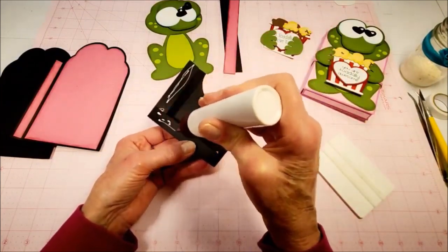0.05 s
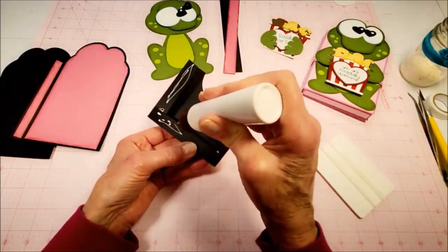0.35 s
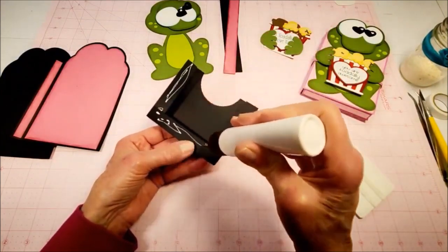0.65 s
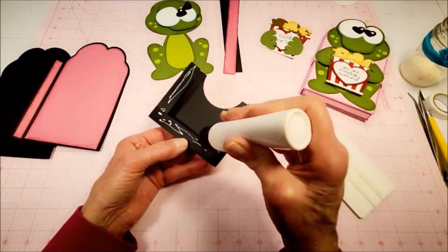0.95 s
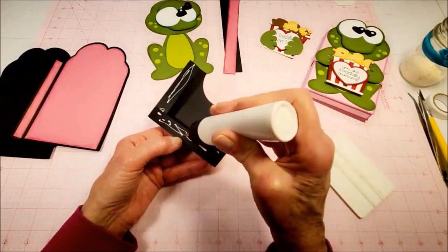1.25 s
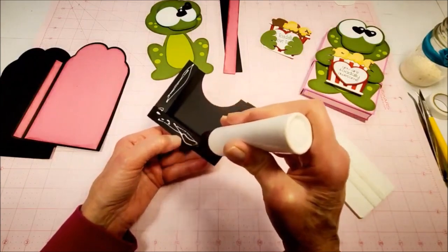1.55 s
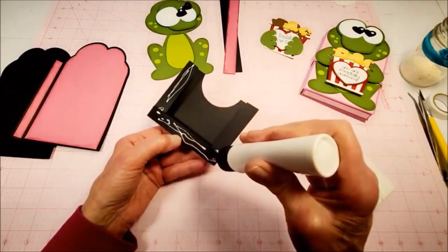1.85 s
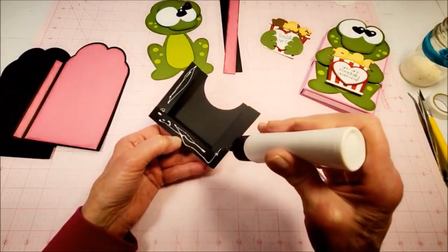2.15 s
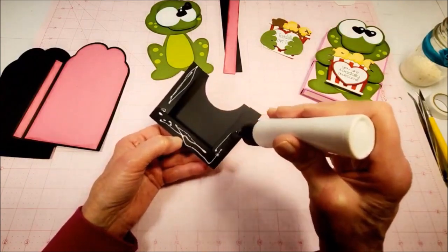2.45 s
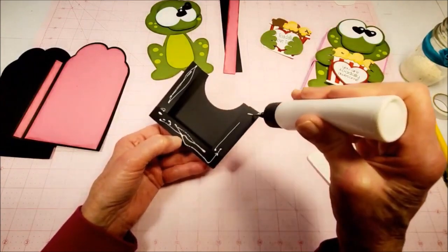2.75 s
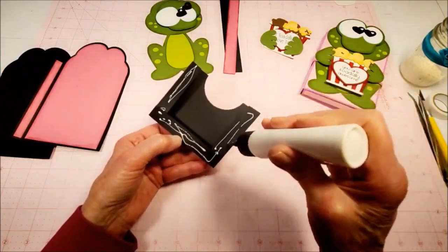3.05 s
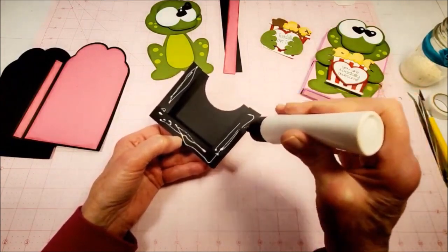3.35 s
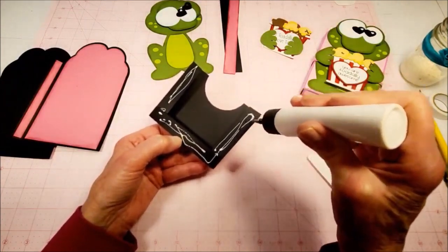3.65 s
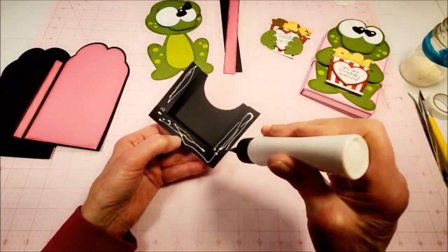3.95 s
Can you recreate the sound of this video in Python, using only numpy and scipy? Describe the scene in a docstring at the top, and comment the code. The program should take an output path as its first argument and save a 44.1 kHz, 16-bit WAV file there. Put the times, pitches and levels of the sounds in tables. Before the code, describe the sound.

Dry, papery scraping comes in short runs as a glue bottle tip is dragged over cardstock close to the microphone. One crisp tap falls about halfway, and more strokes follow over a small room's quiet hum.

```python
"""Over a quiet room hum, a plastic glue nozzle scrapes along three edges of a hand-held card.
Paper fibres catch and slip under the tip: the card rings near 2 kHz, with a rasp and hiss above it.
The slowing tip nearly squeaks, the bottle and card knock softly, and fingers shift their grip.
At one corner the tip skips and taps the card. The mat, desk clutter and small room add short echoes."""
import sys
import numpy as np
from scipy import signal
from scipy.fft import rfft, irfft, next_fast_len
from scipy.io import wavfile
from scipy.ndimage import uniform_filter1d, map_coordinates

SR = 44100
rng = np.random.default_rng(int(sys.argv[2]) if len(sys.argv) > 2 else 0)


def wav_out(sig):
    """Save sig, one row per channel (or a flat mono array), as 16-bit PCM at SR to the path in sys.argv[1]."""
    wavfile.write(sys.argv[1], SR, np.round(np.clip(np.atleast_2d(sig).T, -1, 1) * 32767).astype(np.int16))


N = 176400

# How alike the card sounds on the left and right: pitch_hz, likeness (1 = the same)
CARD_LIKENESS = [(500, 1), (1500, 0.9), (3000, 0.98), (6000, 0.52), (12000, 0.23)]
# How much louder the left side is with the tip near the corner: pitch_hz, left_over_right_db
CORNER_BALANCE = [(800, 4), (1300, -1), (2400, -4.5), (3300, 2.5), (4700, -1.5), (6000, -6.5), (7300, -7),
                  (9000, 1), (14000, 0.5)]
# How far the left side's wave runs ahead with the tip out to the right: pitch_hz, lead_radians
TIP_RIGHT_LEAD = [(400, 0.12), (1750, 0.28), (2300, 1.22), (2800, 2.39), (3800, 2.46), (4800, 4.43),
                  (5900, 4.3), (7000, 4.6), (8000, 10.5), (15000, 20.6)]


def amp(db):
    """Turn decibels into a number to multiply by."""
    return 10 ** (np.asarray(db) / 20)


def unit(x):
    """Scale a signal to an average strength (rms) of 1."""
    return x / np.sqrt(np.mean(x ** 2) + 1e-20)


def along(points, hz):
    """Read between rows of pitch_hz, value, with octaves evenly spaced."""
    pitches, values = np.transpose(points)
    return np.interp(np.log(hz + 1), np.log(pitches + 1), values)


def wobble(per_s):
    """A smooth curve through per_s random values each second."""
    position = np.arange(N) * per_s / SR
    return map_coordinates(rng.standard_normal(4096), [position], mode="wrap")


def filtered(x, response):
    """Multiply each frequency in x by response(hz)."""
    size = next_fast_len(N + SR // 2)
    return irfft(rfft(x, size) * response(np.fft.rfftfreq(size, 1 / SR)), size)[..., :N]


def spread(pair, likeness):
    """Blend two unrelated signals into a left and right that are partly alike."""
    turn = lambda hz: np.arccos(np.clip(along(likeness, hz), -1, 1)) / 2
    mid, side = filtered(pair, lambda hz: np.array([np.cos(turn(hz)), np.sin(turn(hz))]))
    return np.array([mid + side, mid - side])


def stereo_noise(likeness, response):
    """Left and right noise of strength 1, with its tone shaped by response(hz)."""
    return unit(filtered(spread(rng.standard_normal((2, N)), likeness), response))


def placed(x, balance, lead):
    """Sound reaches the left and right microphones at different levels and points in its wave."""
    half = np.array([[.5], [-.5]])
    return filtered(x, lambda hz: amp(half * along(balance, hz)) * np.exp(1j * half * along(lead, hz)))


def room_hum(hum_hz=109.7, waver_db=3, air_db=-68):
    """The room's air is a soft rush of noise, with a low wavering hum."""
    # Tone of the air: pitch_hz, relative_db
    air_tone = [(15, -21), (25, -17), (50, -1.5), (70, -4.5), (122, 1), (183, -16), (246, -10), (421, -20),
                (722, -17), (945, -23), (1710, -27.5), (2490, -27.5), (3440, -23), (4040, -31.5),
                (5880, -29.5), (9550, -41.5), (13200, -40.5), (15500, -52)]
    # How alike the air is on the left and right: pitch_hz, likeness
    air_likeness = [(60, 1), (150, 0.75), (300, 0.1), (1500, 0.12), (5000, 0.043)]
    # Slow rise and fall of the hum: time_s, relative_db
    hum_swell = [(0.0, -69), (0.27, -80), (0.78, -70.5), (1.44, -75), (1.93, -64), (2.5, -73), (2.92, -77),
                 (4.0, -83)]
    t = np.arange(N) / SR
    air = stereo_noise(air_likeness, lambda hz: amp(along(air_tone, hz)))
    hum_db = np.interp(t, *np.transpose(hum_swell)) - 0.5 + waver_db * wobble(21.82)
    hum = np.sqrt(2) * np.sin(2 * np.pi * hum_hz * t + wobble(9.24))
    return amp(air_db) * air + amp(hum_db) * hum


def fibre_slips(per_s=9000, uneven_db=1):
    """Fibres catch on the tip and let go, making two dense streams of tiny clicks."""
    caught = rng.random((2, N)) < per_s / SR
    direction = np.sign(rng.standard_normal((2, N)))
    size = amp(uneven_db * np.clip(rng.standard_normal((2, N)), -2.5, 2.5))
    return caught * direction * size


def card_resonance(hz):
    """The card boosts the pitches at which it naturally bends back and forth."""
    # The card's ringing pitches: pitch_hz, width_hz, relative_db
    modes = [(1040, 60, -8), (1533, 88, 4), (1665, 39, 2), (1920, 50, -2), (2020, 76, 2.5),
             (2304, 130, -0.5), (2606, 120, 0.5), (3450, 330, -3), (4850, 110, -10), (5320, 86, -1),
             (6450, 170, -2), (7650, 490, -2.5)]
    peaks = sum(amp(db) ** 2 / (1 + (2 * (hz - pitch) / width) ** 2) for pitch, width, db in modes)
    return np.sqrt(0.5 + peaks / peaks.max())


def card_sag(x, strokes, sag_share=.035, wander_share=.012):
    """The card gives as each stroke bears down: its pitches sink, then rise again."""
    t = np.arange(N) / SR
    sag = sum(np.interp(t, np.linspace(rows[0][0], rows[-1][0], 3), [0, 1, 0]) for rows in strokes)
    speed = 1 + sag_share * (.5 - sag) + wander_share * wobble(11)
    position = np.cumsum(speed)
    return np.array([map_coordinates(side, [position], order=5, mode="wrap") for side in x])


def scrape(strokes, tone, balance, lead, ring_top_hz=2744, rasp_top_hz=7710):
    """At one place on the card, the same fibre slips feed a ring, a higher rasp and a hiss on top."""
    t = np.arange(N) / SR
    slips = spread(fibre_slips(), CARD_LIKENESS)
    rub = filtered(slips, lambda hz: amp(along(tone, hz)) * card_resonance(hz))
    rub = placed(card_sag(rub, strokes), balance, lead)
    below = lambda top_hz: filtered(rub, lambda hz: 1 / (1 + (hz / top_hz) ** 12))
    ring, ring_and_rasp = below(ring_top_hz), below(rasp_top_hz)
    bands = [ring, ring_and_rasp - ring, rub - ring_and_rasp]
    gains = np.zeros((3, N))
    for stroke in strokes:
        times, ring_db, rasp_db, hiss_db = np.transpose(stroke)
        levels = [ring_db - 0.5, ring_db + rasp_db - 1.5, ring_db + hiss_db + 0.5]
        gains = np.maximum(gains, [amp(np.interp(t, times, db, left=-200, right=-200)) for db in levels])
    sound = sum(gain * band / band.mean(0).std() for gain, band in zip(gains, bands))
    grip_db = 0.45 * wobble(120)  # the tip grips unevenly
    pressure_db = 0.98 * wobble(39)  # the hand's push varies more slowly
    return sound * amp(grip_db + pressure_db)


def nozzle_strokes():
    """The tip is dragged over five places on the card, each with its own tone."""
    # Loudness through each stroke, one list a stroke: time_s, ring_db, rasp_over_ring_db, hiss_over_ring_db
    left = [
        [(0.038, -68, -10, -28), (0.054, -56.5, -7, -27), (0.076, -53, 0.5, -14), (0.164, -48, 0.5, -9),
         (0.25, -49.5, -3.5, -18), (0.292, -55, -5.5, -20), (0.335, -75, -13, -18)],
        [(0.335, -76, -10, -19), (0.345, -58.5, -14, -28), (0.379, -61, 5, -21), (0.389, -58.5, 0.5, -19),
         (0.441, -52.5, 2, -18), (0.493, -58, -8.5, -22), (0.525, -88.5, -12, -4)],
        [(0.53, -79.5, 0, -18), (0.543, -66.5, -7, -22), (0.568, -55, -4, -27), (0.574, -49.5, -9.5, -27),
         (0.591, -54.5, 4.5, -12.5), (0.701, -44, -3, -14), (0.805, -45.5, -2.5, -16.5),
         (0.867, -51, -7.5, -23.5), (0.905, -78, -5, -9)],
    ]
    long_stroke = [(0.905, -80, -2, -19), (0.937, -53.5, -11.5, -32), (0.979, -48.5, -4, -17),
                   (1.073, -46.5, -1, -20), (1.1, -48.5, -6, -27), (1.153, -54.5, -7.5, -27),
                   (1.161, -52, -9.5, -28), (1.221, -62.5, -11.5, -25), (1.296, -49.5, -5.5, -19.5),
                   (1.329, -53.5, -8.5, -20.5), (1.385, -89, -3, -14)]  # a single stroke
    corner = [
        [(1.385, -75, -12, -18), (1.399, -62, -7.5, -25), (1.433, -61.5, -11.5, -29), (1.563, -56.5, -15, -31),
         (1.637, -48, -17, -35), (1.7, -57, -3, -17)],
        [(1.7, -56.5, -3, -19), (1.728, -52, -7, -16.5), (1.826, -60, -5, -15), (1.862, -57, -4.5, -13.5),
         (1.988, -61, -9, -23), (2.0, -71, -2, -17)],
        [(2.0, -65, -12, -26), (2.062, -52, -7.5, -16), (2.092, -54.5, -1.5, -10), (2.154, -52, -9, -19),
         (2.169, -62, 0, -13)],
        [(2.185, -57, -6, -17), (2.205, -54, -8, -23), (2.211, -53, -8.5, -22), (2.261, -56, -9, -34),
         (2.293, -100, 15, -12), (2.32, -93, 2, -12)],
    ]
    lower = [
        [(2.413, -88, -1, -9), (2.419, -61.5, -19, -28), (2.445, -66, -4, -23), (2.457, -57, -2.5, -13),
         (2.495, -54.5, -3.5, -13.5), (2.525, -50.5, -6, -17), (2.611, -50, -4, -9), (2.703, -48.5, -4, -7.5),
         (2.735, -96, 3, 1), (2.76, -96, 5, -8)],
    ]
    end = [
        [(2.895, -100, -21, -18), (2.906, -66, 5, -27), (2.914, -61, -2, -20), (2.952, -57.5, -10, -10),
         (2.988, -61.5, -5, -15), (3.048, -50.5, 3, -15), (3.078, -59.5, 10.5, -4.5), (3.135, -103, 10, -2)],
        [(3.135, -112, 6, -8), (3.151, -51.5, 14.5, -8), (3.167, -42.5, 3, -9.5), (3.205, -46.5, 2.5, -11),
         (3.299, -56.5, -12.5, -30), (3.317, -64, -32, -43), (3.34, -77, -17, -27)],
        [(3.69, -78, -4, -19), (3.718, -62.5, -6, -30), (3.738, -64, -21, -40), (3.748, -59, -10, -30),
         (3.792, -57.5, -1, -16), (3.812, -72, -8, -13), (3.826, -68.5, 14, 1), (3.845, -78, -8, -7)],
        [(3.845, -80, 8, -6), (3.865, -58, 8.5, 4), (3.895, -49, 0, -8), (3.911, -56, 4, -4),
         (3.929, -52.5, -3, -10.5), (3.941, -53.5, 4.5, -6), (3.965, -66, 5, -4), (4.0, -103, 15, -4)],
    ]
    back = [
        [(3.34, -83, -21, -35), (3.351, -68, 1, -21), (3.364, -52.5, -5.5, -21), (3.38, -50.5, 0.5, -17.5),
         (3.448, -47, -1, -12.5), (3.606, -50.5, -10, -17.5), (3.624, -55.5, -7, -13), (3.662, -56, -7, -18),
         (3.69, -93, -12, -13)],
    ]
    # Tone of the card at each place: pitch_hz, relative_db
    left_tone = [(240, -56), (400, -38), (452, -26), (503, -34.5), (942, -29), (1080, -18), (1190, -18),
                 (1540, -6.5), (1960, -3), (2590, -4), (2900, -9.5), (3400, -10), (6780, -18.5),
                 (7440, -16), (9950, -32.5), (13100, -27.5), (15500, -37)]
    corner_tone = [(240, -61), (400, -24), (873, -35), (957, -43), (1080, -12), (1220, -13), (1540, -4.5),
                   (1960, -3), (2470, -4), (3060, -11.5), (3510, -10), (5910, -21.5), (7550, -14.5),
                   (10100, -23.5), (12900, -18), (15500, -26)]
    lower_tone = [(240, -55), (400, -34), (860, -32), (1050, -11), (1340, -12), (1690, -4), (1990, -10),
                  (2290, -8), (2970, -11), (3620, -6), (4700, -21), (6680, -19), (7440, -11), (9070, -25),
                  (10600, -28), (13700, -23), (15500, -31)]
    end_tone = [(240, -56), (400, -33), (503, -47), (577, -25.5), (957, -21), (1080, -8.5), (1170, -10),
                (1510, -2.5), (1710, 4), (1790, -3.5), (2030, -2), (2970, -15.5), (3460, -8), (4700, -8),
                (6680, -12), (7210, -9.5), (9210, -25.5), (13100, -18), (15500, -26.5)]
    back_tone = [(240, -61), (400, -32), (577, -44), (738, -15.5), (942, -23), (1030, -7), (1170, -16),
                 (1450, 1), (1660, 0.5), (2900, -12), (3250, -8), (4090, -12), (5150, -12), (6380, -11),
                 (9210, -30), (11900, -24.5), (15500, -23.5)]
    # How much louder the left side is: pitch_hz, left_over_right_db
    left_balance = [(800, 4), (1300, 0.5), (2400, -4), (3100, 2), (3900, 1.5), (4700, -6.5), (7400, -7),
                    (9000, 0.5), (14000, -0.5)]
    end_balance = [(700, 3), (1300, -1), (2400, -3.5), (3400, 2.5), (4400, -2.5), (5500, -1.5),
                   (7300, -7.5), (9000, 1.5), (14000, 0)]
    # How far the left side's wave runs ahead with the tip near the middle: pitch_hz, lead_radians
    middle_lead = [(400, 0.12), (1900, 0.24), (2800, 1.7), (4000, 1.8), (6400, 1.81), (7000, 4.4),
                   (7800, 0.86), (15000, 6.3)]
    return (scrape([*left, long_stroke], left_tone, left_balance, middle_lead)
            + scrape(corner, corner_tone, CORNER_BALANCE, TIP_RIGHT_LEAD)
            + scrape(lower, lower_tone, CORNER_BALANCE, TIP_RIGHT_LEAD)
            + scrape(end, end_tone, end_balance, TIP_RIGHT_LEAD)
            + scrape(back, back_tone, end_balance, TIP_RIGHT_LEAD))


def card_flex(x, depth_db=2.5):
    """The card bends under the tip, so patches of pitch swell and fade."""
    spectrum = signal.stft(x, nperseg=512, noverlap=384)[2]
    patches = rng.standard_normal(spectrum.shape[1:])
    for _ in range(2):
        patches = uniform_filter1d(patches, size=3, axis=0)  # smooth across pitch
        patches = uniform_filter1d(patches, size=13, axis=1)  # smooth across time
    gain = unit(amp(depth_db * unit(patches)))
    return signal.istft(spectrum * gain, nperseg=512, noverlap=384)[1][:, :N]


def mat_echo(x):
    """A bounce off the mat cancels some pitches, and these glide as the hands move."""
    # The bounce: time_s, delay_ms, strength (1 = as strong as the direct sound)
    bounce = [(0, 1.6, 0.095), (2.5, 1.78, 0.17), (2.7, 0.84, 0.46), (2.9, 1.42, 0.22), (3.18, 1.44, 0.16),
              (3.28, 1.66, 0.26), (3.36, 1.46, 0.13), (3.58, 1.8, 0.15), (4, 1.15, 0.072)]
    n = np.arange(N)
    times, delay_ms, strength = np.transpose(bounce)
    delay = np.interp(n / SR, times, delay_ms) * SR / 1000
    gain = np.interp(n / SR, times, strength)
    echo = np.array([map_coordinates(side, [n - delay]) for side in x])
    return (x + gain * echo) / np.hypot(1, gain)


def echo_tail(x, fade_times):
    """Many echoes blur into a tail; fade_times says how long each pitch takes to fall 60 dB."""
    hz, t, noise = signal.stft(rng.standard_normal((2, SR // 2)), SR, nperseg=256)
    fade = amp(-60 * t / along(fade_times, hz)[:, None])
    tail = signal.istft(noise * fade, SR, nperseg=256)[1]
    return signal.fftconvolve(x, tail / np.linalg.norm(tail[0]), axes=1)[:, :N]


def desk_echoes(x, turns_per_s=1.31):
    """Two sets of echoes off nearby clutter trade places as the hands move, so the tone drifts."""
    # How long the clutter's echoes last: pitch_hz, fade_s
    fade_times = [(200, 0.044), (2000, 0.079), (12000, 0.024)]
    turn = 2 * np.pi * turns_per_s * np.arange(N) / SR
    return echo_tail(x * np.cos(turn), fade_times) + echo_tail(x * np.sin(turn), fade_times)


def room_echoes(x):
    """The small room adds a short tail in which high pitches die first."""
    # How long the room's echoes last: pitch_hz, fade_s
    fade_times = [(200, 0.19), (2000, 0.16), (12000, 0.12)]
    return echo_tail(x, fade_times)


def rubs(swells, width_octaves):
    """Brief rubbing makes swells of noise, each gathered around one pitch."""
    t, out = np.arange(N) / SR, np.zeros((2, N))
    for peak_s, half_length_s, pitch_hz, level_db in swells:
        band = lambda hz: np.exp(-.5 * (np.log2((hz + 1) / pitch_hz) / width_octaves) ** 2)
        swell = np.exp(-((t - peak_s) / half_length_s) ** 2)
        out += amp(level_db) * swell * stereo_noise(CARD_LIKENESS, band)
    return out


def tip_squeaks():
    """The slowing tip nearly squeaks: its rubbing narrows almost to a single note."""
    # Near-squeaks: peak_s, half_length_s, pitch_hz, level_db
    squeaks = [(.487, 0.013, 1553, -52.5), (1.16, 0.04, 1520, -59.5), (2.917, 0.011, 1680, -51.5),
               (3.19, 0.02, 1523, -46.5), (3.368, 0.014, 1964, -51), (3.928, 0.0063, 1710, -54)]
    return rubs(squeaks, width_octaves=0.027)


def soft_knocks(rise_s=0.0039, fade_s=0.076):
    """Each bump of the handled bottle and card briefly rings one low, hollow note."""
    # Bumps: start_s, pitch_hz, level_db
    bumps = [(.544, 422, -67), (.547, 238, -52), (1.0, 462, -57.5)]
    out = np.zeros(N)
    for start_s, pitch_hz, level_db in bumps:
        t = np.maximum(np.arange(N) / SR - start_s, 0)
        rise = 1 - np.exp(-(t / rise_s) ** 2)
        out += amp(level_db - 60 * t / fade_s) * rise * np.sin(2 * np.pi * pitch_hz * t)
    return out


def finger_shifts():
    """Fingers slide on the card with a soft, low rustle."""
    # Slides: peak_s, half_length_s, pitch_hz, level_db
    slides = [(1.27, 0.12, 613, -79), (2.14, 0.13, 817.3, -71.5), (3.03, 0.021, 440, -72),
              (3.29, 0.058, 813, -68)]
    return rubs(slides, width_octaves=0.2)


def tip_taps(snap_above_hz=7000, snap_fade_s=0.0055, click_fade_s=0.037, thump_rise_s=0.0024):
    """The tip strikes or catches the card: a bright snap, a dry click and the card's dull thump."""
    # Strikes: start_s, click_db, thump_db (relative levels)
    strikes = [(2.1691, -37, -55), (2.1723, -46.5, -74), (2.178, -38.5, -49.5), (2.453, -59, -88),
               (2.903, -78, -92), (3.824, -61, -85), (3.877, -55, -84)]
    # Notes in the held card's thump: pitch_hz, relative_db, fade_s (time to fall 60 dB)
    thump_notes = [(106, -2, 0.087), (160, 10, 0.1), (192, 5.5, 0.072), (382, -7, 0.091), (756, -4, 0.083),
                   (2310, 15, 0.11)]
    # Tone of the click: pitch_hz, relative_db
    click_tone = [(200, -8), (900, -4.5), (2200, 13), (3500, 5), (7500, -2), (10000, -27), (15000, -9)]
    snaps, clicks, thumps = np.zeros((3, N))
    for start_s, click_db, thump_db in strikes:
        t = np.maximum(np.arange(N) / SR - start_s, 0)
        snaps += (t > 0) * amp(click_db - 9.5 - 60 * t / snap_fade_s)
        clicks += (t > 0) * amp(click_db - 60 * t / click_fade_s)
        ring = sum(amp(db - 60 * t / fade_s) * np.sin(2 * np.pi * hz * t)
                   for hz, db, fade_s in thump_notes)
        thumps += amp(thump_db - 7.5) * ring * (1 - np.exp(-t / thump_rise_s))
    click_noise = stereo_noise(CARD_LIKENESS, lambda hz: amp(along(click_tone, hz)))
    snap_noise = unit(filtered(click_noise, lambda hz: hz > snap_above_hz))
    return placed(snaps * snap_noise + clicks * click_noise + thumps, CORNER_BALANCE, TIP_RIGHT_LEAD)


def scene(desk_db=-8, room_db=-13.5):
    """The tip works its way round the card in a small, humming room."""
    scraping = mat_echo(card_flex(nozzle_strokes()))
    gluing = scraping + tip_taps() + soft_knocks() + finger_shifts() + tip_squeaks()
    return gluing + amp(desk_db) * desk_echoes(gluing) + amp(room_db) * room_echoes(gluing) + room_hum()


def record(dry, top_hz=15800):
    """Cut away the very highest pitches."""
    return filtered(dry, lambda hz: hz < top_hz)


dry = scene()
out = record(dry)
wav_out(out)
```